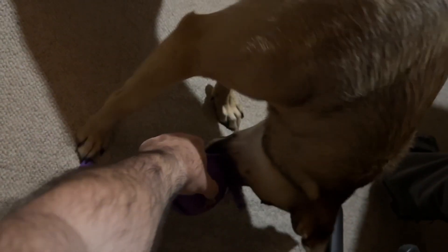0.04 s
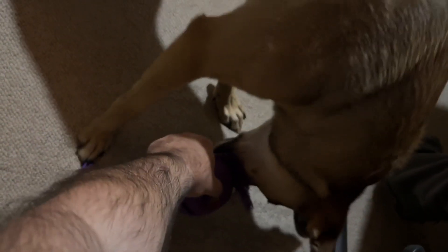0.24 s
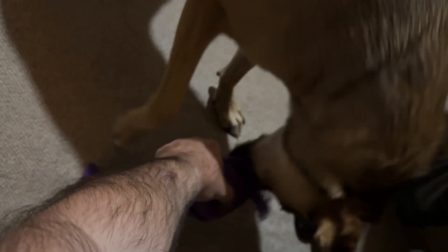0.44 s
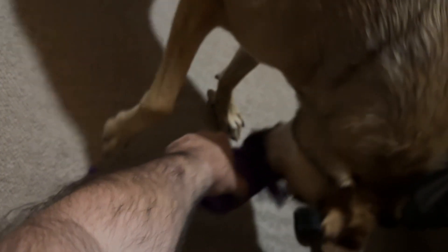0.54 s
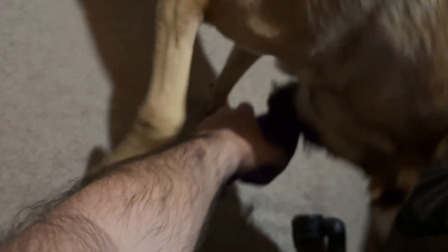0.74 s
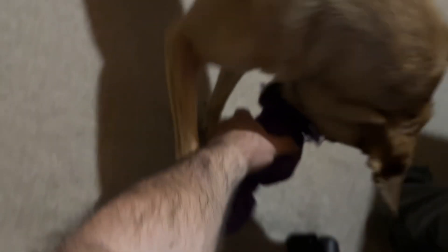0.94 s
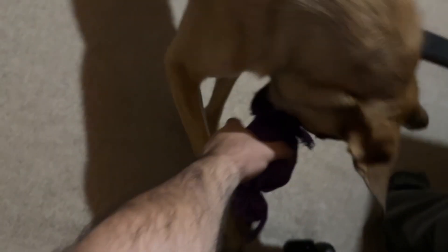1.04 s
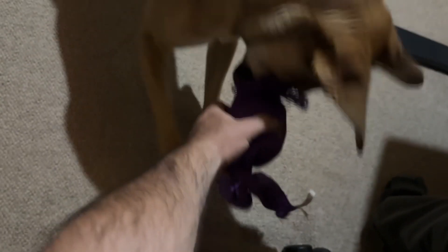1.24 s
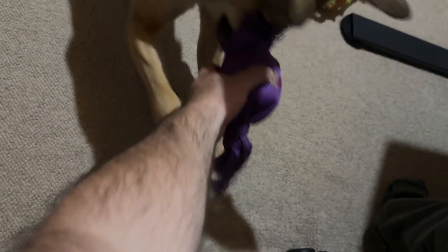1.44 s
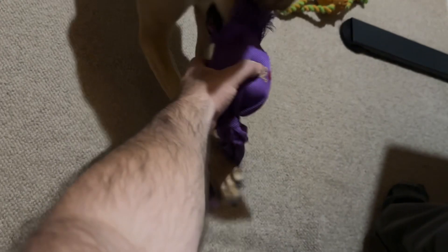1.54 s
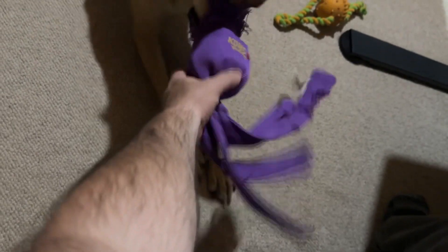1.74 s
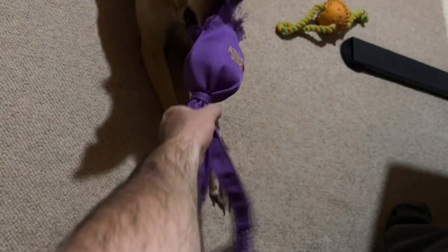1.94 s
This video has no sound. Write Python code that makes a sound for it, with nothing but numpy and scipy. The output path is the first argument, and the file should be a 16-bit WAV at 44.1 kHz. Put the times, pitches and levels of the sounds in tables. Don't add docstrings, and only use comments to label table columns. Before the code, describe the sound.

A rubber squeaky toy gives one loud, bright, reedy squeak at about 0.2 s, barely a tenth of a second long, rising quickly then sagging. A soft paw thump and thin air leak precede it; air hisses back in until 0.6 s. Quiet brushing and light thumps follow, then stronger carpet scraping, ticks and a heavier thump around 1.5-1.7 s, with sharp clicks near 1.9 s. Low ventilation rumbles throughout.

```python
import sys
import numpy as np
from scipy import signal
from scipy.fft import rfft, irfft
from scipy.io import wavfile
from scipy.ndimage import uniform_filter1d

SR = 44100
rng = np.random.default_rng(int(sys.argv[2]) if len(sys.argv) > 2 else 0)


def to_wav(sig):
    pcm = np.clip(np.atleast_2d(sig), -1, 1) * 32767
    pcm = np.round(pcm).astype(np.int16)
    wavfile.write(sys.argv[1], SR, pcm.T)


def gain_from_db(level_db):
    decades = np.asarray(level_db, float) / 20
    return 10 ** decades


N = 88200
T = np.arange(N) / SR


def unit(x):
    return x / np.sqrt(np.mean(x ** 2))


def walk(rate_hz, size=N):
    k = int(SR / rate_hz)
    return unit(uniform_filter1d(uniform_filter1d(rng.standard_normal(size), k), k))


def filtered(x, order, edge_hz, kind="low"):
    return signal.sosfilt(signal.butter(order, edge_hz, kind, fs=SR, output="sos"), x)


def swells(rows):
    total = 0
    for start, peak, end, db in rows:
        ramp = np.interp(T, [start, peak, end], [0, 1, 0])
        total = total + gain_from_db(db) * np.sin(np.pi / 2 * ramp) ** 2
    return total


def hiss(colour, alike_hz, flicker_db, flicker_hz=14, peaks=()):
    f = np.maximum(np.arange(N // 2 + 1) * SR / N, 1)
    hz, db = np.array(colour).T
    gain = gain_from_db(np.interp(np.log(f), np.log(hz), db, left=-90, right=-90))
    for centre_hz, width_hz, peak_db in peaks:
        gain = gain + gain_from_db(peak_db) / (1 + ((f - centre_hz) / (width_hz / 2)) ** 2)
    alike = 0.95 / (1 + (f / alike_hz) ** 2)
    mid, side = rfft(rng.standard_normal((2, N)))
    left_leads_s = 6e-5
    lead = np.exp(2j * np.pi * np.minimum(f, 4000) * left_leads_s * np.array([[1], [0]]))
    shared = mid * np.sqrt(1 + alike)
    apart = side * np.sqrt(1 - alike) * np.array([[1], [-1]])
    spectrum = gain * lead * (shared + apart)
    octave = np.log2(f / 32)
    out = 0
    for k in range(10):
        band = np.clip(1 - abs(octave - k), 0, 1)
        out = out + gain_from_db(flicker_db * walk(flicker_hz)) * irfft(spectrum * band, N)
    return unit(out)


# (frequency [Hz], level [dB])
VENT_COLOUR = [(25, -28), (60, -5.5), (170, -12), (330, -21.5), (800, -29.5), (2400, -40), (4600, -41.5),
               (6500, -34), (10000, -46), (16000, -57.5)]
# (frequency [Hz], width [Hz], level [dB])
MOTOR_HUMS = [
    (57.04, 41, -65),
    (168.5, 58, -65),
]


def office():
    out = gain_from_db(-59.5) * hiss(VENT_COLOUR, 600, 0.41, 7.7)
    for hz, width_hz, db in MOTOR_HUMS:
        out = out + gain_from_db(db) * hiss([(20, -91), (30, -96.0)], 780, 5.4, 2.0, [(hz, width_hz, 0)])
    return out * gain_from_db(np.array([[.5], [-.5]]))


# (time [s], level [dB])
DRAG_COURSE = [(0, -60.5), (.06, -77), (.24, -64), (.3, -62.5), (.46, -65.5), (.54, -84), (.9, -82),
               (1.0, -67.5), (1.12, -85.5), (1.34, -61), (1.41, -64.5), (1.46, -59.5), (1.51, -55),
               (1.61, -56), (1.66, -53), (1.78, -58), (1.86, -63), (1.99, -63.5)]
# (frequency [Hz], level [dB])
SCRAPE_COLOUR = [(150, -16.5), (250, -2.5), (500, -6.5), (950, -15.5), (1750, -18), (3000, -21.5),
                 (3900, -30.5), (5500, -31)]
# (frequency [Hz], width [Hz], level [dB])
SCRAPE_RINGS = [(1175, 140, -10.5), (1370, 340, -9.5), (2220, 220, -11), (3240, 710, -25.5),
                (4700, 1500, -24)]


def drag():
    grain_db = 2.1 * walk(240)
    strength = gain_from_db(np.interp(T, *np.array(DRAG_COURSE).T) + grain_db)
    return strength * hiss(SCRAPE_COLOUR, 2500, 1.2, 30, SCRAPE_RINGS)


# (start [s], peak [s], end
# [s], level [dB], extra level of the crisp top [dB])
BRUSH_STROKES = [(0.513, 0.575, .63, -63, -2), (0.716, 0.755, 0.83, -67.5, -3.5),
                 (0.79, 0.857, 0.89, -70.5, 7.5), (0.872, 0.904, 1.011, -59.5, 2.5),
                 (1.17, 1.208, 2.6, -66.5, -7), (1.218, 1.308, 1.4, -72.5, 4),
                 (1.363, 1.528, 1.647, -61, 4), (1.583, 1.634, 1.85, -66, 4),
                 (1.85, 1.885, 1.94, -71.5, 7.5), (1.625, 1.637, 1.678, -65, -3),
                 (.94, 1.004, 1.1, -68, -0.5)]
# (frequency [Hz], level [dB])
BRUSH_COLOUR = [(410, -43.5), (700, -11), (2210, 2), (3800, -5.5), (6400, -3), (9600, -1), (13000, -8.5),
                (15900, -5)]
# (frequency [Hz], width [Hz], level [dB])
BRUSH_RINGS = [(4930, 800, -8.5), (8760, 1500, -4.5)]


def brush():
    top_hz = 12000
    fur = hiss(BRUSH_COLOUR, 1090, 1.2, 34.9, BRUSH_RINGS)
    body = swells([(start, peak, end, db) for start, peak, end, db, _ in BRUSH_STROKES])
    crisp = swells([(start, peak, end, db + top_db) for start, peak, end, db, top_db in BRUSH_STROKES])
    return body * filtered(fur, 6, top_hz) + crisp * filtered(fur, 6, top_hz, "high")


# (time [s], level [dB], frequency [Hz], rise [s], time to
# fade by 60 dB [s])
LOW_THUMPS = [(0.01, -40.5, 66, .012, 0.13), (.31, -53, 57, .04, .5), (.4, -53.5, 60, .03, 0.27),
              (0.591, -53.5, 57, .03, .3), (0.792, -50, 56, .03, 0.37), (0.869, -52, 172, 0.053, 0.2),
              (1.06, -63, 110, .03, 0.18), (1.169, -53, 173, .04, 0.85), (1.491, -55.5, 79.5, .03, .3),
              (1.54, -55, 216, 0.022, 0.37), (1.632, -40, 281.8, 0.013, 0.0053),
              (1.6479, -36.5, 54.1, 0.0013, 0.36), (1.661, -46, 96, 0.0023, 0.16),
              (1.655, -50, 176, 0.016, 0.21), (1.798, -53, 88, .02, 0.17), (1.86, -53.5, 56, 0.033, 0.44),
              (1.93, -50.5, 90, 0.0086, 0.1), (.145, -58.5, 60, 0.012, .2), (.23, -55.5, 60, .02, .3)]


def thumps():
    start_ratio, drop_s = 2.3, 0.0087
    right_late = 15
    out = np.zeros(N)
    for s, db, hz, rise, t60 in LOW_THUMPS:
        u = np.maximum(T - s, 0)
        turns = hz * (u + (start_ratio - 1) * drop_s * (1 - np.exp(-u / drop_s)))
        level = gain_from_db(db - 60 * np.maximum(u - rise, 0) / t60) * np.minimum(u / rise, 1)
        out -= level * np.sin(2 * np.pi * turns)
    return np.array([out, np.pad(out, (right_late, 0))[:N]])


# (time [s], peak level [dB],
# frequency [Hz])
TICKS = [(0.296, -57, 14680), (0.807, -65, 2220), (1.0062, -48.5, 2614), (1.0704, -60.5, 930),
         (1.105, -56, 2330), (1.456, -57, 1294), (1.502, -49, 1270), (1.557, -48, 1490),
         (1.632, -55, 1500), (1.638, -56, 3270), (1.637, -47, 8000), (1.638, -42.5, 11000),
         (1.517, -52, 8500), (1.527, -44, 2330), (1.586, -53, 1370), (1.672, -52, 2400),
         (1.64, -41, 759), (1.6694, -53, 1900), (1.893, -41.5, 1335), (1.8932, -55, 5540),
         (1.9246, -38, 1269)]


def ticks():
    bounce_s, bounce_db = .0042, -16
    out = np.zeros(N)
    for s, db, hz in TICKS:
        peak_s = max(.85 / hz / 2, .00012)
        for late, gain in ((0, 1), (bounce_s, gain_from_db(bounce_db))):
            u = np.maximum(T - s - late, 0)
            fade = u / peak_s
            level = gain * gain_from_db(db) * np.e * fade * np.exp(-fade)
            out -= level * np.sin(2 * np.pi * hz * u)
    return out


# (start [s], peak [s], end [s], level [dB])
LEAK_SWELL = [
    (-0.18, .04, 0.23, -73),
]
# (frequency [Hz], level [dB])
LEAK_TINT = [(3800, -28), (4800, 0), (6800, -4.5), (8000, -26)]


def leak():
    return swells(LEAK_SWELL) * hiss(LEAK_TINT, 2500, 1.2)


# (start [s], peak [s], end [s], level [dB])
VALVE_PUFFS = [
    (.105, .15, 0.38, -57),
    (.27, .34, 0.62, -59.5),
]
# (frequency [Hz], level [dB])
PUFF_COLOUR = [(500, -23), (800, -12.5), (2800, -7), (5000, -11), (8200, -7.5), (10000, -11.5),
               (14000, -11), (16000, -17)]
# (frequency [Hz], width [Hz], level [dB])
VALVE_RINGS = [(8400, 1300, 0), (3350, 400, -5)]


def puffs():
    blown_out = hiss(PUFF_COLOUR, 2700, 1.2, 14, VALVE_RINGS)
    drawn_in = filtered(blown_out, 4, 9500)
    return swells(VALVE_PUFFS[:1]) * blown_out + swells(VALVE_PUFFS[1:]) * drawn_in


def room(x):
    t60_s = 0.14
    u = np.arange(SR // 3) / SR
    fade = gain_from_db(-60 * u / t60_s) * np.clip(u / 0.0024 - .5, 0, 1)
    tail = filtered(rng.standard_normal((2, len(u))) * fade, 1, 7040)
    tail = tail / np.sqrt(np.sum(tail ** 2) / 2)
    return gain_from_db(-16.5) * signal.fftconvolve(x, tail, axes=1)[:, :N]


def reed(course, partials, thin):
    waver_hz, jitter, dispersion = 110, .003, .07
    onset_thin = 1.7
    squeak = slice(0, SR // 3)
    t = T[squeak]
    size = len(t)
    s, hz, db = np.array(course).T
    pitch_hz = uniform_filter1d(np.interp(t, s, hz), size=130)
    squeeze_db = uniform_filter1d(np.interp(t, s, db), size=130)
    phase = 2 * np.pi * np.cumsum(pitch_hz * (1 + jitter * walk(210, size))) / SR
    on = (t > s[0]) & (t < s[-1])
    opening = t < s[4]
    out, flow = np.zeros((2, N)), np.zeros(N)
    for k, left_db, right_db, lead in partials:
        each_ear = np.array([walk(waver_hz, size) for ear in range(2)])
        waver_db = 3.6 * min(k / 7, 1) * (walk(waver_hz, size) + .45 * each_ear)
        thinning = 1 + thin * np.where(opening, onset_thin, 1) * np.log2(k)
        level_db = np.array([[left_db], [right_db]]) + waver_db + squeeze_db * thinning
        turn = k * phase - dispersion * k ** 2 + np.array([[lead], [0]])
        out[:, squeak] += on * gain_from_db(level_db) * np.cos(turn)
    flow[squeak] = on * gain_from_db(squeeze_db * np.where(opening, onset_thin, 0.7))
    return out, flow


# (time [s], pitch [Hz], squeeze level [dB])
LOW_COURSE = [(.18, 610, -40), (.187, 628, -17), (.194, 668, -6), (.201, 724, -.5), (.22, 726, 0),
              (.24, 709, -.5), (.255, 680, -4), (.268, 640, -12), (.277, 605, -36)]
HIGH_COURSE = [(.156, 1072, -49.5), (.184, 1042, -27.5), (.192, 1047, -9.5), (.199, 866.5, -3.5),
               (.21, 922, 0), (.225, 913.4, -1), (.244, 868.3, -1.5), (.254, 832, -9.5), (.263, 784, -38.5)]
# (multiple of the pitch, left level [dB], right level [dB], left lead [rad])
LOW_TONES = [(1, -32, -24.5, -.3), (2, -39, -35, -1.6), (3, -41, -36, 1.9), (4, -40, -33, 1.5),
             (5, -37, -33, 2.6), (6, -46, -37, -3), (7, -38, -42, .2), (8, -42, -49, -.1),
             (9, -38, -41, 1.9), (10, -33, -40, -.4), (11, -33, -34, .7), (12, -37, -42, -.7),
             (13, -38, -36, -1.3), (14, -44, -43, -3), (15, -46, -46, -3.1), (16, -44, -44, 3.1),
             (17, -52, -52, 2.6), (18, -57, -57, 1), (19, -51, -49, .2), (20, -60, -60, 0),
             (21, -63, -63, 0)]
HIGH_TONES = [(1, -30, -28, .2), (2, -25, -21, .6), (3, -29.5, -21.5, .7), (4, -30, -26, 2.6),
              (5, -33, -38, -2.4), (6, -30, -35, -.6), (7, -32, -32, 1.8), (8, -33, -38, 1.5),
              (9, -30, -36, -.6), (10, -27, -28, -1), (11, -40, -40, -3.1), (12, -34, -34, -3.1),
              (13, -44, -44, 3.1), (14, -40, -39, 2.2), (15, -49, -47, .2), (16, -56, -56, 0),
              (17, -63, -63, 0)]
# (frequency [Hz], level [dB])
REED_AIR_COLOUR = [(500, -30), (1500, -18), (3800, -24), (5500, -6), (8500, 0), (10000, -8), (13500, -19),
                   (15800, -24)]


def toy_squeak():
    low, low_flow = reed(LOW_COURSE, LOW_TONES, .45)
    high, high_flow = reed(HIGH_COURSE, HIGH_TONES, .42)
    rush = gain_from_db(-38) * (low_flow + high_flow) * hiss(REED_AIR_COLOUR, 3000, 1.2, 67)
    toy = gain_from_db(0.08) * (low + high) + rush
    return toy + room(toy)


def scene():
    dog = drag() + brush() + thumps() + ticks()
    toy = leak() + puffs() + toy_squeak()
    return office() + dog + toy


def roll_off(x):
    return signal.sosfilt(signal.butter(12, 15830, fs=SR, output="sos"), x)


# (frequency [Hz], level [dB])
MIC_SHARED = [(20, -17), (32, -7), (42, 1.5), (3600, 0.5), (4000, 0.5), (4400, 2), (9900, -0.5),
              (10500, -16), (12200, -6), (12900, 0)]
# (frequency [Hz], level [dB])
MIC_APART = [(20, -17), (45, 2), (9700, -1.5), (10500, -7.5), (13000, -3), (13700, -15.5), (16000, -11)]


def record(dry):
    f = np.arange(N // 2 + 1) * SR / N

    def port(x, response):
        return irfft(rfft(x) * gain_from_db(np.interp(f, *np.array(response).T)), N) / 2

    mid = port(dry[0] + dry[1], MIC_SHARED)
    side = port(dry[0] - dry[1], MIC_APART)
    return roll_off(np.array([mid + side, mid - side]))


dry = scene()
out = record(dry)
to_wav(out)
```